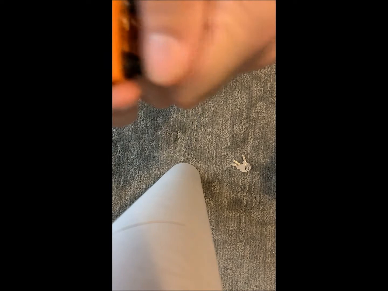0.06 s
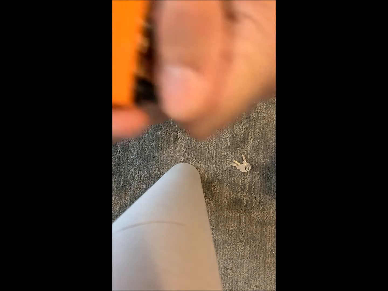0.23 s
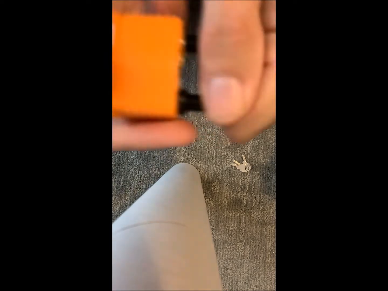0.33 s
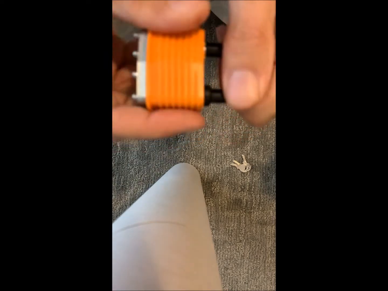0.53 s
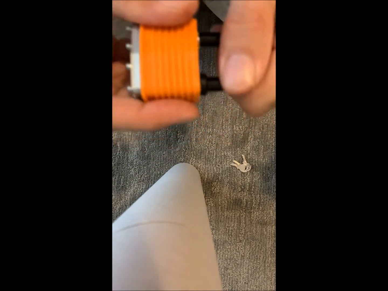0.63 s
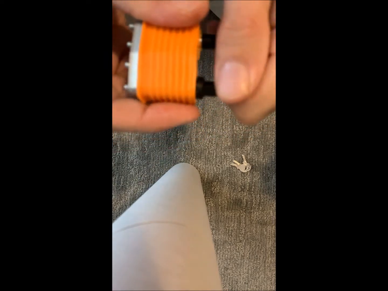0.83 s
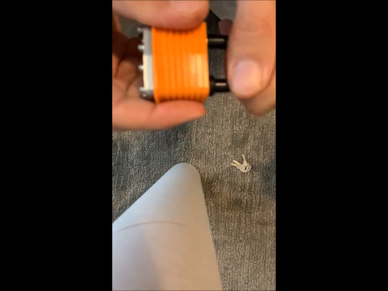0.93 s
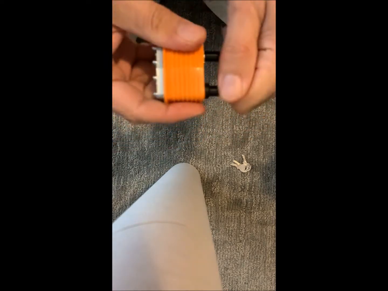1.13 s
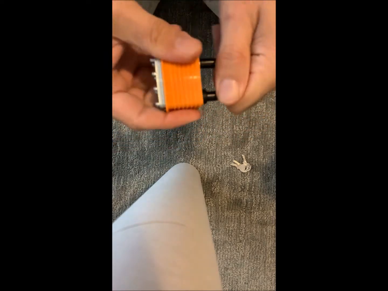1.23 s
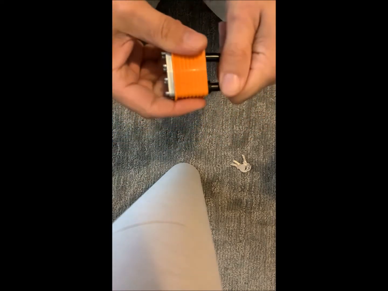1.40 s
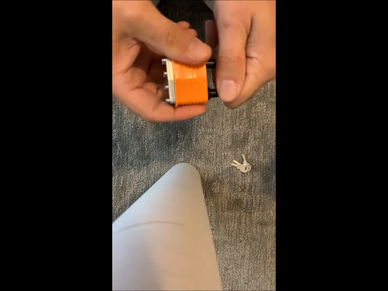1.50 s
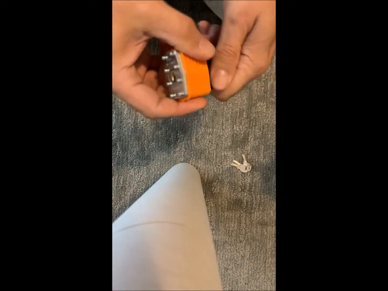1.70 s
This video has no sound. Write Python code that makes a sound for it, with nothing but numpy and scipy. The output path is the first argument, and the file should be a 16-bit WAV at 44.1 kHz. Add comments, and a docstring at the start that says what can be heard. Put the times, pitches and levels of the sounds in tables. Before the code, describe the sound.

A small padlock is worked in the hands, close by. After a few faint ticks, it gives one loud metallic snap at about 0.25 seconds, ringing briefly with a short room echo and soft low boom. Much lighter clicks follow around 0.4 to 0.5 seconds, then scatter unevenly until 1.7, with tiny spring pings and soft finger rubs. A faint wavering hum, rumble and hiss lie underneath.

```python
"""A few faint ticks, then one loud metallic snap: a small padlock worked in the hands, close by.
The latch strikes home in quick contacts that crack, knock the case and set the lock ringing.
Light, dry clicks of the mechanism follow; a small spring pings and fingers rub on the case.
The quiet room answers with a short echo and a low boom, over a wavering hum, soft rumble and hiss."""
import sys
import numpy as np
from scipy import signal
from scipy.fft import rfft, irfft
from scipy.io import wavfile
from scipy.ndimage import uniform_filter1d

SR = 44100
rng = np.random.default_rng(int(sys.argv[2]) if len(sys.argv) > 2 else 0)


def generate_wav(sig):
    """Save sig (samples, or channels by samples) to the path in sys.argv[1] as 16-bit PCM at SR."""
    pcm = np.round(np.clip(np.atleast_2d(sig).T, -1, 1) * 32767).astype(np.int16)
    wavfile.write(sys.argv[1], SR, pcm)


N = 77175
T = np.arange(N) / SR
HZ = np.fft.rfftfreq(2 * N, 1 / SR)
RING_START_S = 0.2428


# Two faint lead-in noise bursts, then the latch contacts: start_s, crack_db, knock_db
SNAP_BURSTS = [(0.2365, -43.5, -48.5), (0.2400, -38, -42), (0.2416, -31, -24.5), (0.2424, -18.5, -35.5),
               (0.244, -19, -30.5), (0.2463, -25, -37.5), (0.2480, -31, -36), (0.2502, -39, -38.5)]
# Crack spectrum: freq_hz, gain_db
CRACK_COLOUR = [(1000, -23), (3000, -14.5), (4300, -10), (6000, -7), (7500, -4.5), (9000, 0.5),
                (11500, -0.5), (13300, -2.5), (15100, -4), (15700, -24.5)]
# Case knock spectrum: freq_hz, gain_db
KNOCK_COLOUR = [(60, -21), (130, -6), (350, -24.5), (550, -16), (750, -3), (1500, -2.5), (2400, -4.5),
                (4000, -7.5), (8000, -23)]

def latch_snap(crack_decay_s=0.00088, knock_decay_s=0.0012):
    """A faint, brief rise of noise, then the latch strikes home in a few quick contacts."""
    out = np.zeros(N)
    crack, knock = minimum_phase(CRACK_COLOUR), minimum_phase(KNOCK_COLOUR)
    for start_s, crack_db, knock_db in SNAP_BURSTS:
        add(out, start_s, amp(crack_db) * unit_energy(signal.fftconvolve(burst(crack_decay_s), crack)))
        add(out, start_s, amp(knock_db) * unit_energy(signal.fftconvolve(burst(knock_decay_s), knock)))
    return out


# Lock modes: pitch_hz, gain_db, t60_s
LOCK_MODES = [(1767, -18, 0.066), (1995, -10.5, 0.086), (3040, -13, 0.058), (4730, -10, .025),
              (5570, -7, 0.038), (6730, 0, .036), (7010, -12.5, 0.019), (7630, -10.5, 0.061),
              (8040, -8.5, .025), (9120, -4.5, 0.041), (10380, -6.5, .022), (10950, -5.5, 0.023),
              (11550, 0, .028), (12300, 0.5, .024), (14290, -10.5, .02), (15200, -13, .015)]

def lock_ring():
    """The struck lock rings briefly, damped by the hand."""
    return unit_energy(damped_modes(LOCK_MODES, T[:6000]))


# Light contacts, one level per resonance: start_s, knock_db, clack_db, clink_db, tick_db, ping_db
CLICKS = [(0.051, -73, -58, -68, -72, -88.5), (0.0584, -61.5, -61, -74, -84, -85),
          (0.116, -71, -80, -80, -71.5, -82), (0.3666, -76, -71, -64.5, -78, -70),
          (0.4030, -62, -62, -60, -65, -78), (0.4141, -74, -64, -46.5, -37.5, -47),
          (0.4161, -59, -50.5, -51.5, -38, -53), (0.432, -71, -70, -63, -61, -66),
          (0.4439, -63.5, -73, -76, -74, -80), (0.5006, -71.5, -73, -90, -71, -62),
          (0.5284, -55.5, -52, -63, -43, -43), (0.7012, -78, -76.5, -68.5, -63, -78),
          (0.8245, -76, -65, -65, -53.5, -44.5), (0.8322, -75, -59.5, -61, -55, -69),
          (1.0458, -66, -66, -57.5, -45, -56), (1.0480, -58.5, -61, -62, -59, -69),
          (1.178, -63.5, -75, -91, -88, -88), (1.1841, -66, -77, -86, -88, -80),
          (1.1930, -73, -70.5, -87, -70.5, -62.5), (1.284, -62, -89, -94, -84, -88),
          (1.3024, -70, -71, -75, -45.5, -55), (1.3112, -69, -69.5, -72, -68, -73),
          (1.389, -64.5, -52, -60.5, -61.5, -75), (1.4213, -62, -79, -91, -91, -90),
          (1.4524, -71, -76, -70, -69, -73), (1.4666, -78, -84, -80, -77, -60),
          (1.4683, -82, -77, -74, -68, -54.5), (1.5150, -82, -75, -76, -75, -75),
          (1.534, -70.5, -64.5, -71, -50, -55), (1.54, -80, -72, -81, -67, -67),
          (1.6382, -63.5, -56, -68, -66, -75), (1.6526, -61, -60, -84, -84, -85),
          (1.6852, -66.5, -78, -68.5, -83, -81)]
# Resonances, knock to ping: centre_hz, stage_width_hz, contact_decay_s
CLICK_RESONANCES = [(1550, 820, .0016), (3613, 1300, 0.0023), (5510, 1500, 0.0012), (9520, 4100, 0.00038),
                    (14200, 2600, 0.00045)]

def mechanism_clicks(grit=0.28, ring_db=-17.5):
    """Each light contact excites five broad resonances and a trace of the lock's ring."""
    out, ring = np.zeros(N), lock_ring()
    for start_s, *levels_db in CLICKS:
        for level_db, (centre_hz, stage_width_hz, contact_decay_s) in zip(levels_db, CLICK_RESONANCES):
            force = grit * burst(contact_decay_s)
            force[0] += 1  # first impact
            b, a = signal.iirpeak(centre_hz, centre_hz / stage_width_hz, SR)
            resonance = signal.lfilter(b, a, signal.lfilter(b, a, force))
            add(out, start_s, amp(level_db) * unit_energy(resonance))
        add(out, start_s, amp(max(levels_db) + ring_db) * ring)
    return out


# Spring plucks: start_s, level_db
PLUCKS = [(0.501, -74.5), (1.327, -68)]
# Spring modes: pitch_hz, gain_db, t60_s
SPRING_MODES = [(10295, -1, 0.091), (11590, -3, 0.054), (12450, 0, 0.083), (14400, -5, 0.071)]

def spring_pings():
    """A small spring inside the lock is plucked and rings, faint and high."""
    out, tone = np.zeros(N), damped_modes(SPRING_MODES, T)
    for start_s, level_db in PLUCKS:
        add(out, start_s, amp(level_db) * tone)
    return out


# Finger slides: centre_s, sigma_s, body_db, hiss_db
RUBS = [(0.01, 0.022, -72.5, -67), (0.055, 0.0086, -68.5, -73), (0.118, 0.016, -74, -87),
        (0.185, 0.0059, -74.5, -83.5), (0.419, 0.011, -64.5, -64.5), (0.665, 0.022, -82, -88),
        (0.946, 0.02, -77.5, -82.5), (1.3, 0.017, -77, -83), (1.391, 0.01, -73.5, -80),
        (1.457, 0.01, -78, -84), (1.682, 0.031, -77.5, -86.5)]
# Friction body spectrum: freq_hz, gain_db
RUB_BODY = [(200, -7.5), (500, -7), (1300, 1), (2200, -2.5), (4000, -4.5), (7000, -18)]
# Friction hiss spectrum: freq_hz, gain_db
RUB_HISS = [(2000, -23.5), (6000, 1), (10500, 3.5), (15000, 1.5), (16200, -13)]

def finger_rubs(grain_depth_db=4):
    """Skin drags over the case in short grainy swells."""
    body, hiss = noise(RUB_BODY), noise(RUB_HISS)
    roughness = unit_rms(uniform_filter1d(rng.standard_normal(N), size=90))
    grain = unit_rms(amp(grain_depth_db * roughness))
    return grain * sum(swell(centre_s, sigma_s) * (amp(body_db) * body + amp(hiss_db) * hiss)
                       for centre_s, sigma_s, body_db, hiss_db in RUBS)


# Handling bumps: start_s, peak_db, pitch_hz
BUMPS = [(0.25, -68.5, 44.9), (0.669, -58, 46.8)]

def handling_bumps(rise_s=0.071):
    """Handling makes deep, soft thumps."""
    out = np.zeros(N)
    envelope = T / rise_s * np.exp(1 - T / rise_s)
    for start_s, peak_db, pitch_hz in BUMPS:
        add(out, start_s, amp(peak_db) * envelope * np.sin(2 * np.pi * pitch_hz * T))
    return out


# Echo spectrum: freq_hz, gain_db
ECHO_COLOUR = [(60, 0.5), (125, 3), (300, 2.5), (500, -5), (700, -6), (2000, -6.5), (4000, -7.5),
               (6500, -8), (10000, -18), (15000, -19)]
# Echo decay: freq_hz, t60_s
ECHO_DECAY = [(100, 0.98), (300, 0.24), (1000, 0.17), (3000, .24), (7000, .22), (15000, .22)]

def room_echo(source, delay_s=0.003, rise_s=0.005):
    """The room returns a diffuse echo whose bass lasts longest."""
    freq_hz, time_s, spectra = signal.stft(rng.standard_normal((2, N)), SR, nperseg=256)
    t60_s = over_freq(ECHO_DECAY, freq_hz)[:, None]
    decay = amp(-60 * time_s / t60_s)
    energy_norm = np.sqrt(2 * np.log(1000) / (t60_s * SR))
    tail = signal.istft(spectra * decay * energy_norm, SR, nperseg=256)[1][:, :N]
    onset = np.clip((T - delay_s) / rise_s, 0, 1)
    response = filtered(stereo_blend(onset * tail), amp(over_freq(ECHO_COLOUR, HZ)))
    return signal.fftconvolve(source[None], response, axes=1)[:, :N]


# Low room modes: pitch_hz, level_db, t60_s
ROOM_MODES = [(115.9, -49, 1), (143.7, -59, .9), (285.6, -73, 1)]

def room_boom(rise_s=0.03):
    """The room's low modes build up after the snap and die away."""
    out = np.zeros(N)
    add(out, RING_START_S, np.minimum(T / rise_s, 1) * damped_modes(ROOM_MODES, T))
    return out


# Hum envelope: time_s, level_db
HUM_LEVEL = [(0.0, -70.5), (0.034, -65), (0.228, -69.5), (0.248, -62), (0.536, -64), (0.554, -71),
             (0.662, -55.5), (0.686, -65), (0.856, -53), (0.95, -57.5), (1.408, -63), (1.456, -57.5),
             (1.524, -66), (1.662, -59), (1.686, -70.5), (1.75, -54.5)]
# Hum drift: time_s, pitch_hz
HUM_PITCH = [(0, 60.76), (0.6, 60.78), (0.85, 64.84), (1.2, 66.5), (1.75, 63.75)]

def hum():
    """One low tone wavers in level and pitch."""
    phase_cycles = np.cumsum(over_time(HUM_PITCH)) / SR + rng.random()
    return amp(over_time(HUM_LEVEL)) * unit_rms(np.sin(2 * np.pi * phase_cycles))


# Grip shifts: centre_s, sigma_s, level_db
GRIP_SHIFTS = [(0.40, .04, -60.5), (0.674, .035, -67), (0.87, 0.034, -74), (0.952, 0.014, -66.5),
               (1.088, .05, -82.5), (1.421, .02, -74)]
# Rumble spectrum: freq_hz, gain_db
RUMBLE_COLOUR = [(20, -6.5), (50, 3.5), (120, 1), (180, -6.5), (280, -11.5), (420, -24), (1500, -51.5)]

def rumble(floor_db=-78.5):
    """A soft rumble swells into low rustles as the hands shift their grip."""
    rustles = sum(amp(level_db) * swell(centre_s, sigma_s) for centre_s, sigma_s, level_db in GRIP_SHIFTS)
    return (amp(floor_db) + rustles) * noise(RUMBLE_COLOUR)


# Room noise spectrum: freq_hz, gain_db
AIR_COLOUR = [(25, 7), (100, 2.5), (250, 0), (560, -9), (1000, -4.5), (2000, 0.5), (2650, -13.5),
              (3800, -16.5), (4600, -22.5), (6700, -15.5), (9000, -22), (11000, -17), (15500, -25.5)]

def room_air(level_db=-79):
    """The quiet room's faint, steady hiss."""
    return amp(level_db) * noise(AIR_COLOUR)


# Left-right likeness of echo and noise: freq_hz, coherence
COHERENCE = [(60, 1), (150, 0.99), (400, 0.42), (2000, 0.57), (4500, .92), (15000, 1)]

def stereo_blend(pair):
    """Blends two unrelated signals: alike in bass and treble, wider in the mids."""
    coherence = over_freq(COHERENCE, HZ)
    right = filtered(pair[0], coherence) + filtered(pair[1], np.sqrt(1 - coherence ** 2))
    return np.array([pair[0], right])


def noise(colour):
    """Stereo noise of a given colour, at rms 1."""
    return unit_rms(filtered(stereo_blend(rng.standard_normal((2, N))), amp(over_freq(colour, HZ))))


def burst(decay_s, size=2048):
    """A short, decaying burst of noise."""
    return rng.standard_normal(size) * np.exp(-T[:size] / decay_s)


def damped_modes(modes, time_s):
    """A sum of exponentially decaying sines."""
    return sum(amp(level_db - 60 * time_s / t60_s) * np.sin(2 * np.pi * pitch_hz * time_s)
               for pitch_hz, level_db, t60_s in modes)


def swell(centre_s, sigma_s):
    """A Gaussian rise and fall."""
    return np.exp(-((T - centre_s) / sigma_s) ** 2 / 2)


def minimum_phase(colour, size=2048):
    """The sharpest impulse response with the given colour."""
    log_gain = np.log(amp(over_freq(colour, abs(np.fft.fftfreq(size, 1 / SR)))))
    return np.fft.ifft(np.exp(signal.hilbert(log_gain).conj())).real


def filtered(x, gain):
    """Applies one gain per frequency in HZ."""
    return irfft(rfft(x, 2 * N) * gain)[..., :N]


def over_freq(points, at_hz):
    """Interpolates a table on a log-frequency axis."""
    freq_hz, values = np.transpose(points)
    return np.interp(np.log(at_hz + 1), np.log(freq_hz + 1), values)


def over_time(points):
    """Interpolates a table at every sample."""
    return np.interp(T, *np.transpose(points))


def amp(db):
    """Decibels to gain."""
    return 10 ** (np.asarray(db) / 20)


def unit_rms(x):
    """Scales to rms 1."""
    return x / np.sqrt(np.mean(x ** 2) + 1e-20)


def unit_energy(x):
    """Scales a transient to the energy of one millisecond at rms 1."""
    return x / np.sqrt(np.sum(x ** 2) * 1000 / SR + 1e-20)


def add(mix, start_s, sound):
    """Mixes a sound in at start_s."""
    part = mix[max(round(start_s * SR), 0):][:len(sound)]
    part += sound[:len(part)]


# Stereo balance of the lock: freq_hz, left_over_right_db
LOCK_BALANCE = [(100, 0), (700, -2.5), (1300, -2.5), (2400, -6), (3600, 0), (4600, 4.5), (6500, -0.5),
                (15000, -1)]

def scene(ring_db=-17, click_send_db=-2, ring_send_db=-10):
    """The lock close by, the hands, the echo and the room's own sound."""
    snap, clicks, ring = latch_snap(), mechanism_clicks(), np.zeros(N)
    add(ring, RING_START_S, amp(ring_db) * lock_ring())
    pan_db = over_freq(LOCK_BALANCE, HZ) / 2
    direct = filtered(snap + clicks + ring, amp([pan_db, -pan_db]))
    echo = room_echo(snap + amp(click_send_db) * clicks + amp(ring_send_db) * ring)
    hands = finger_rubs() + handling_bumps()
    background = hum() + rumble() + room_air()
    return direct + spring_pings() + hands + echo + room_boom() + background


# Right channel phase shift: freq_hz, lag_rad
RIGHT_LAG = [(20, 0), (400, 1.35), (700, -2.4), (1200, 0.53), (2240, 1.0), (3700, 2.0), (4600, 3.0),
             (6600, 6), (8850, 9.5), (11000, 12.5), (13300, 16), (16200, 19.5)]

def record(dry, cutoff_hz=15900):
    """The right channel's treble is phase-shifted slightly behind the left; both are low-passed."""
    lag_rad = np.interp(HZ, *np.transpose(RIGHT_LAG))
    channels = np.array([dry[0], filtered(dry[1], np.exp(-1j * lag_rad))])
    lowpass = signal.firwin(161, cutoff_hz, window=("kaiser", 9), fs=SR)
    return signal.oaconvolve(channels, lowpass[None], "same")


dry = scene()
out = record(dry)
generate_wav(out)
```